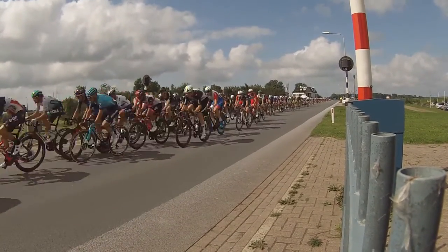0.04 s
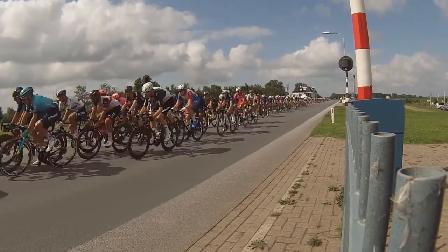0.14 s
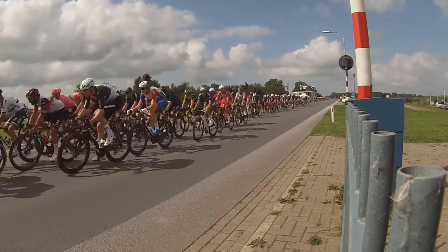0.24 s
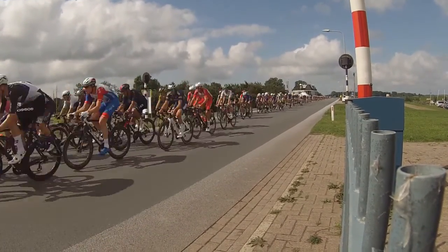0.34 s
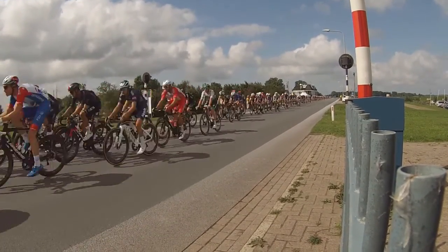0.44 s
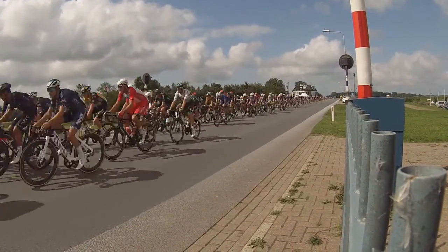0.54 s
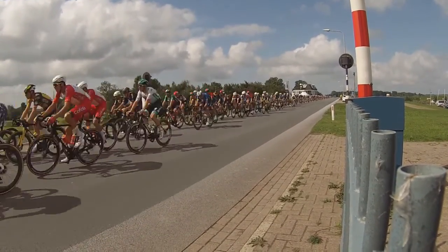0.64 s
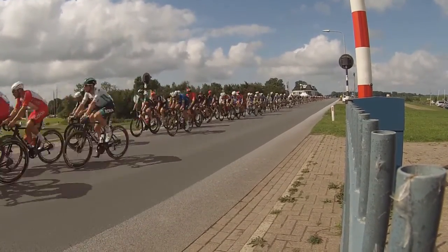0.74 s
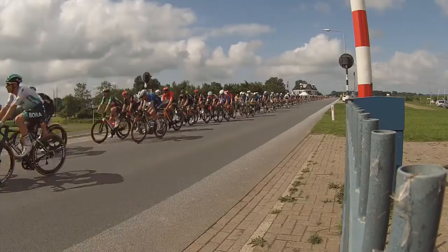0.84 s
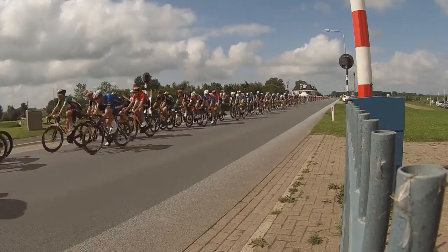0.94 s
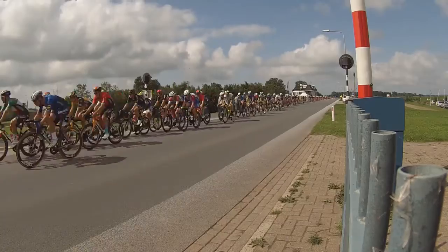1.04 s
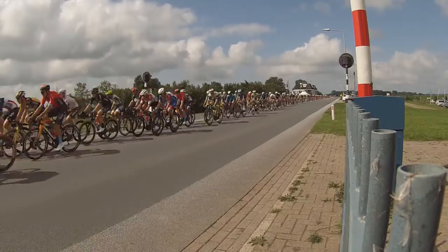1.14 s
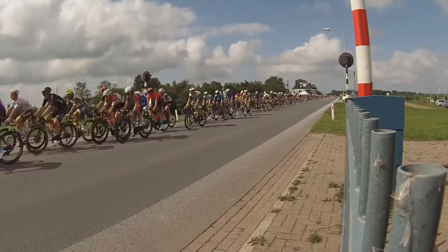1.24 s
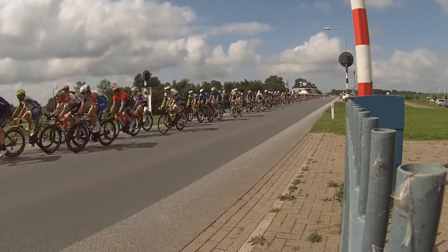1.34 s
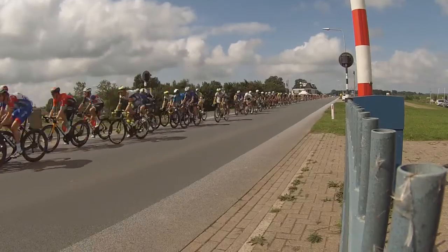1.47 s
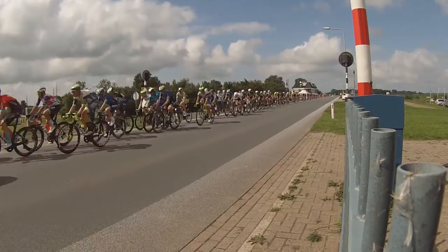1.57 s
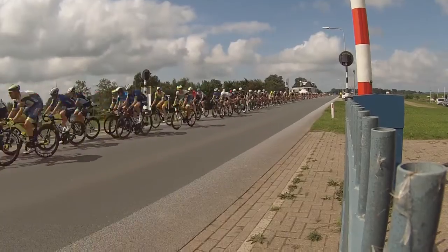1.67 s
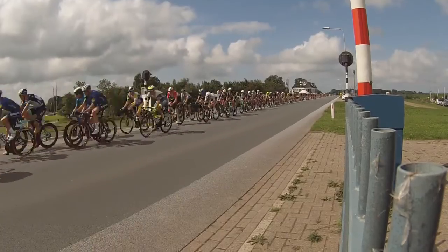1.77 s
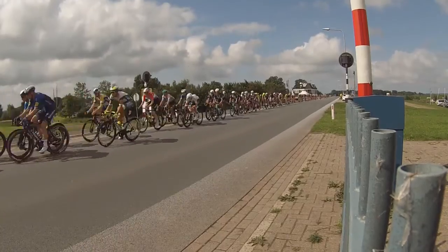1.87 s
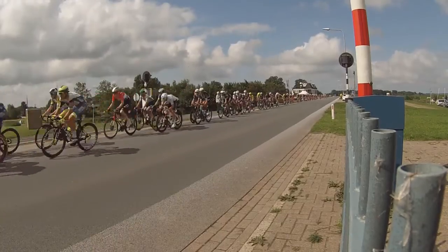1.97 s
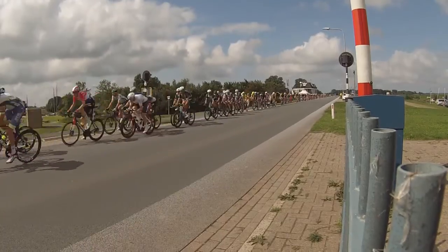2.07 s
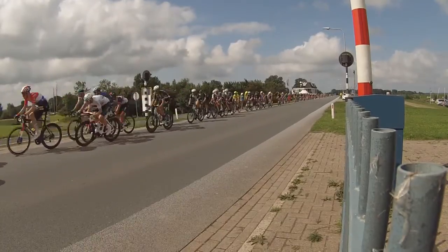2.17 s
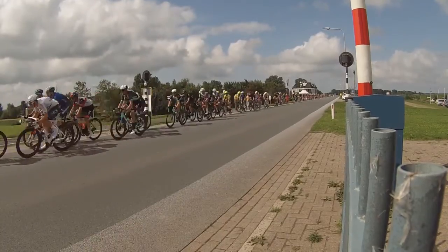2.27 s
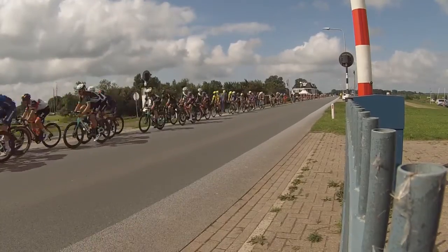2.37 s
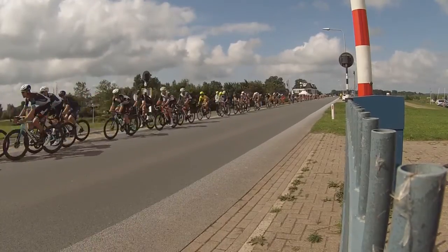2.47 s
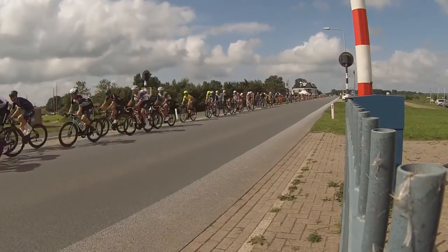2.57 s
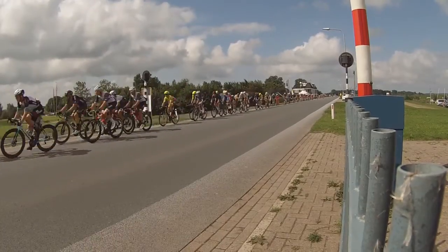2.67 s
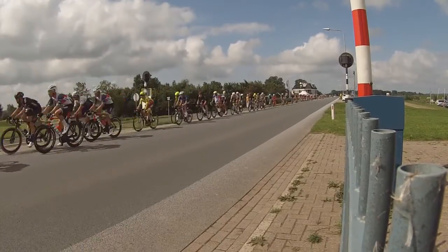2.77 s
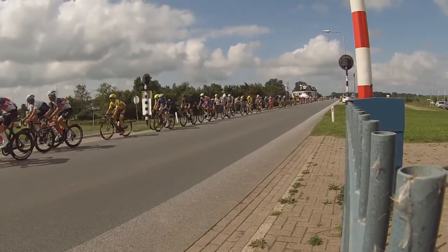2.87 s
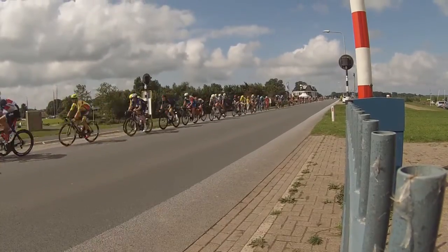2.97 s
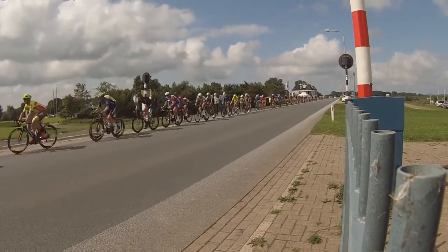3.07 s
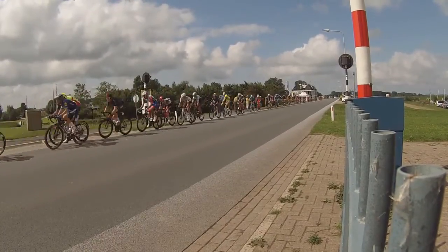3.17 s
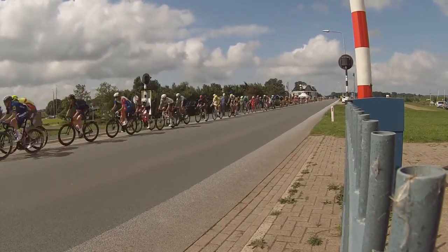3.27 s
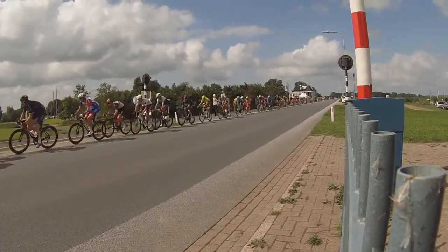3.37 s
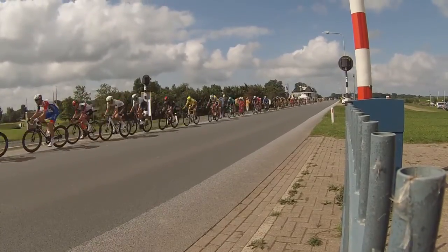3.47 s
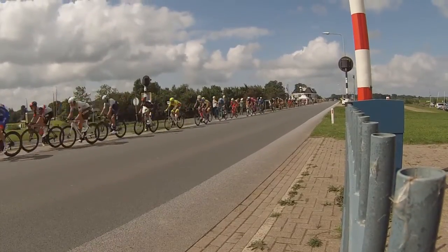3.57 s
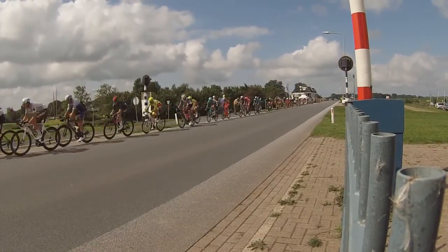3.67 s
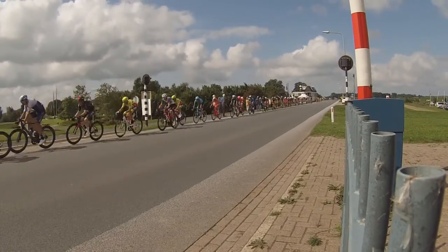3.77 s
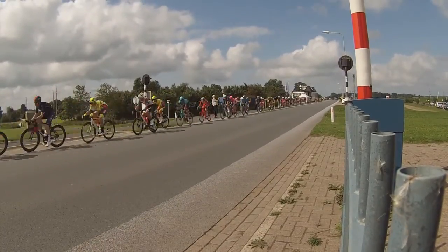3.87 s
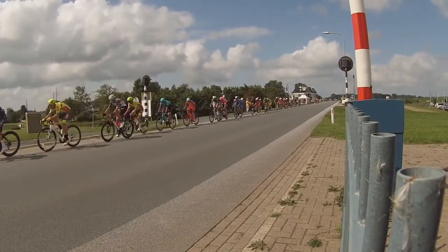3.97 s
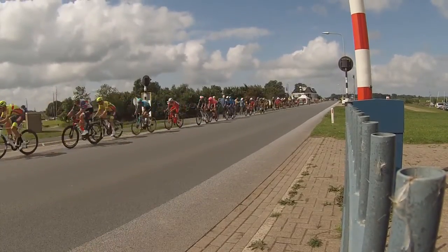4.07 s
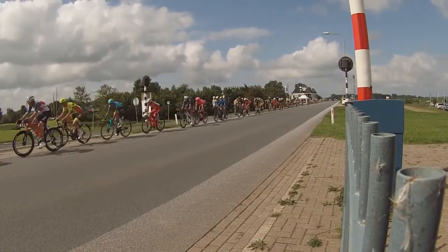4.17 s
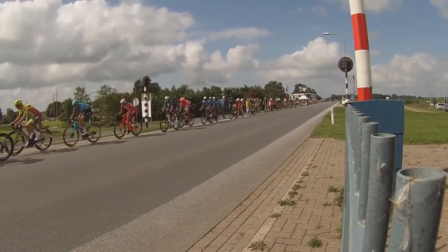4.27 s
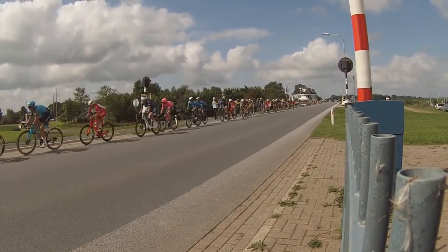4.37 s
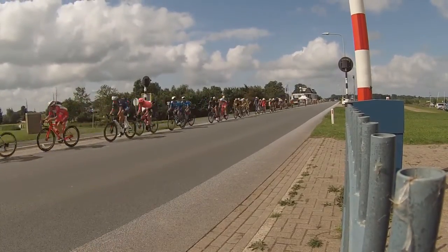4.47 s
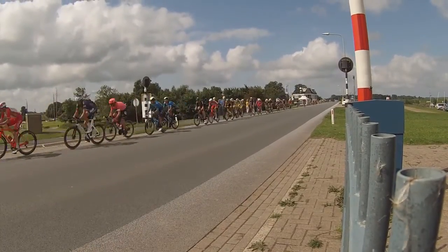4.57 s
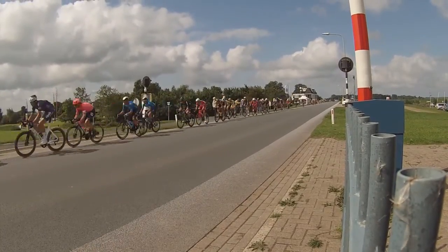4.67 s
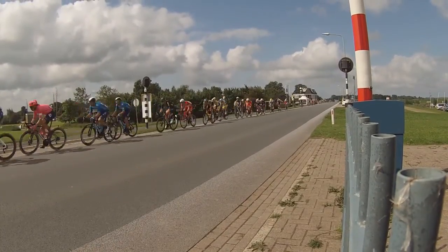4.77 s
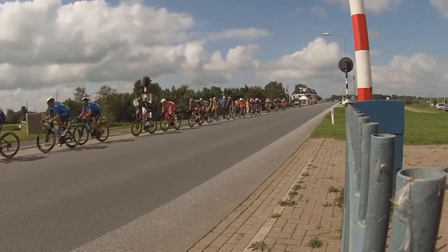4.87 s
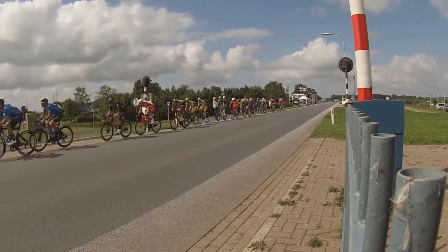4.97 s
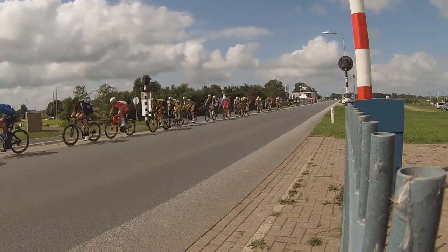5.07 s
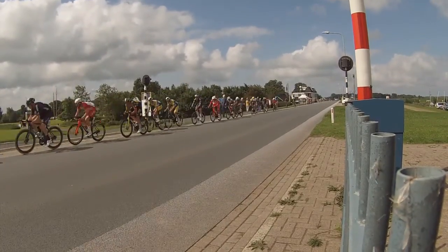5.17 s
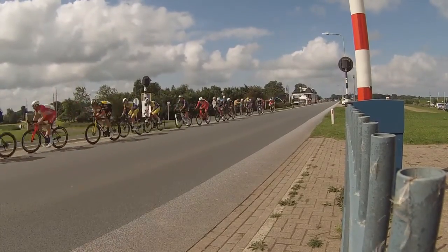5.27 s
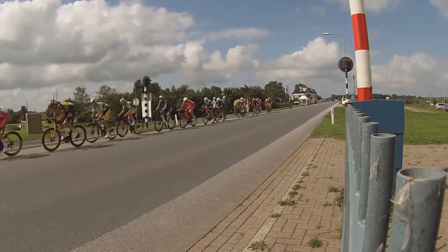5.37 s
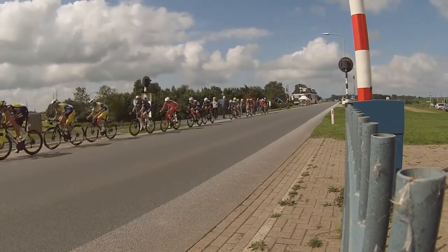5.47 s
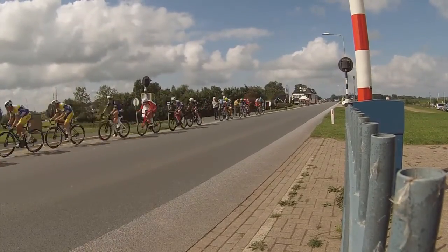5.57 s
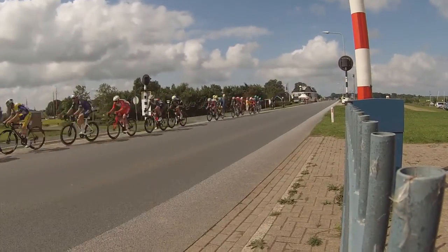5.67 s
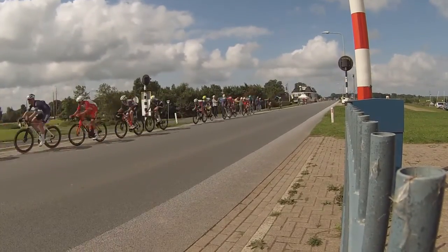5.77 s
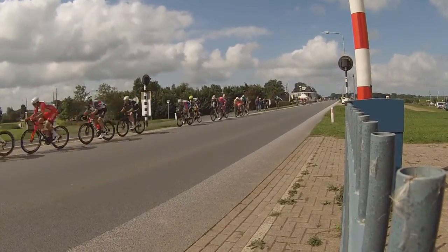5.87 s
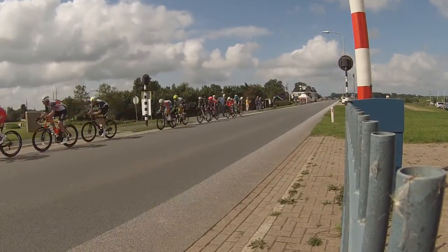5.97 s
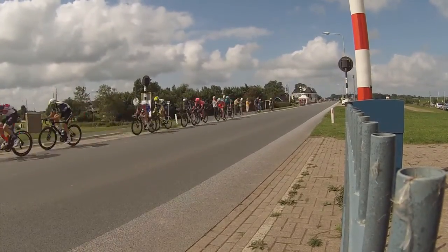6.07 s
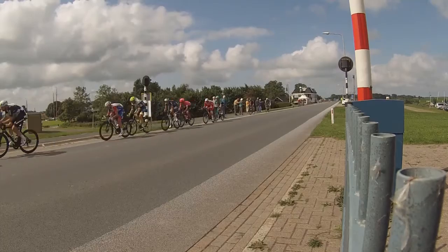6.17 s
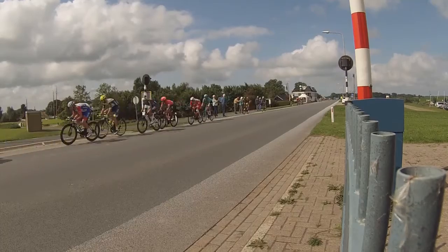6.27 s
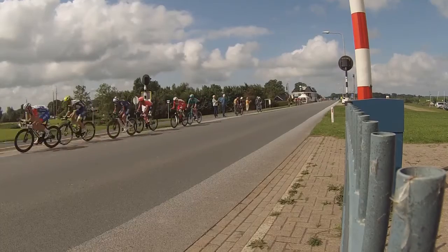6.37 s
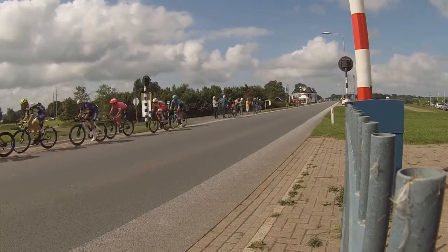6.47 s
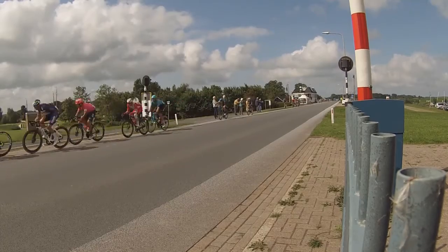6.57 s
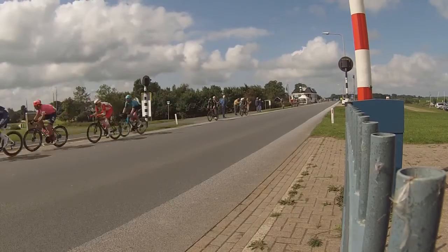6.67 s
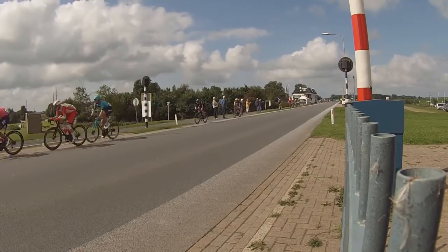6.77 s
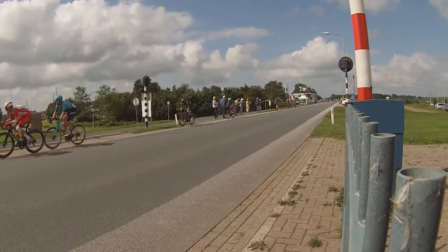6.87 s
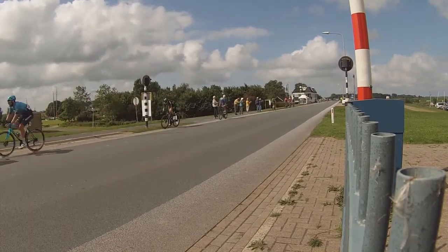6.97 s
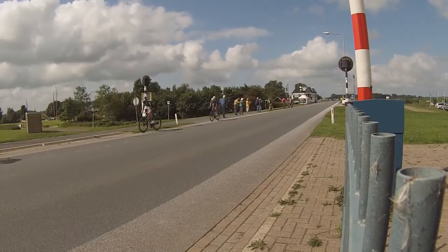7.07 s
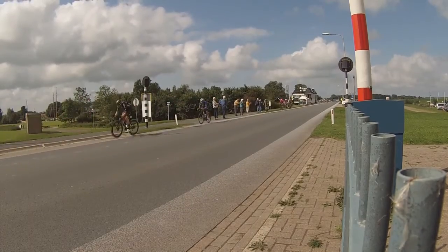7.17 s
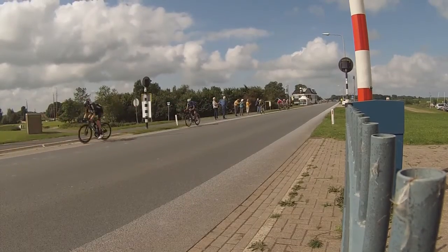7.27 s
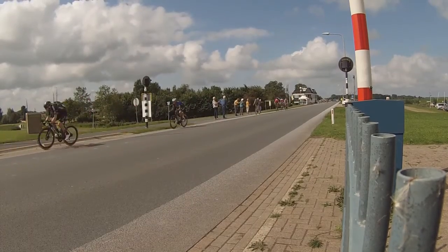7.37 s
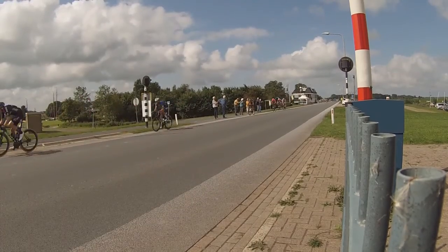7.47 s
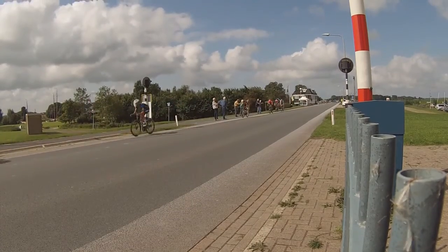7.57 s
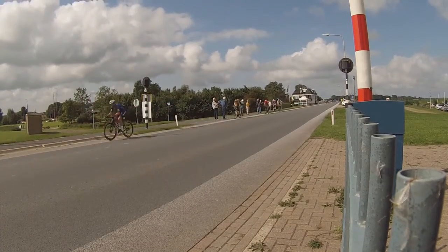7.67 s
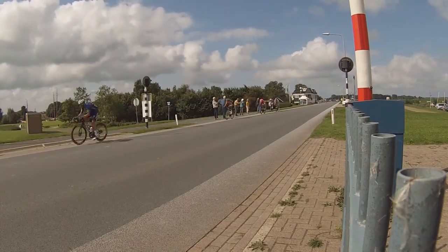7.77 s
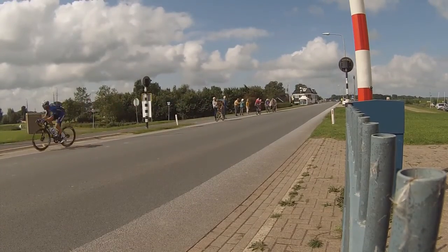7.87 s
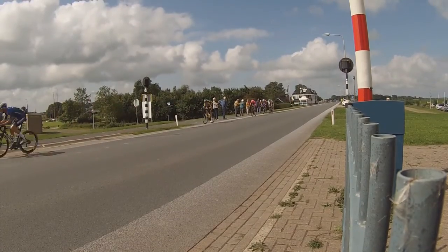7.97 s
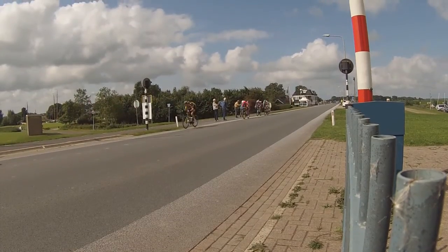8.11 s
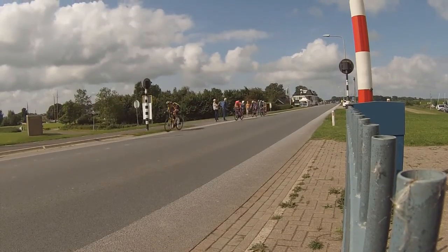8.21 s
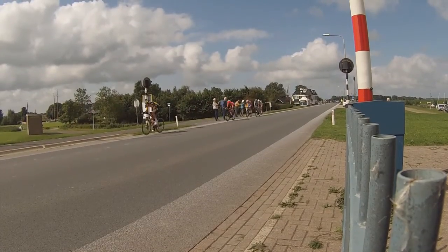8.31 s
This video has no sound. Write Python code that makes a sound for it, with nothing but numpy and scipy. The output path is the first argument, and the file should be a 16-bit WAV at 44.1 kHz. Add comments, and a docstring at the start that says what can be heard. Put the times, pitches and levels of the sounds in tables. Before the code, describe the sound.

Many racing bicycles stream past a small roadside microphone in open country. Their tyres make a continuous hollow, ringing whir on asphalt with airy hiss. A chain sizzle rises around one second, then freewheels buzz briefly near two. Wind buffeting grows from light flutters into hard, low, ragged thumps; loud gusts momentarily push the tyre sound down. A few metallic chain clacks stand out later, and the whir thins as the last riders pass.

```python
"""Tyres of a passing peloton roar and hiss on asphalt: shaped noise with ringing treads and rims.
A fine high hiss, first chain sizzle and then faint background, is grainy shaped noise with small ticks.
Clacks are noise bursts in the bicycle's modes; freewheels buzz as pawl clicks ring their hubs.
Wind and the riders' wake buffet a small roadside camera: turbulent noise in gusts, plus lone eddy pulses.
Its gain control ducks everything at strong peaks, so the tyres swell back slowly after each strong gust.
The treble dips briefly here and there, each time leaving a thin whistle."""
import sys
import numpy as np
from scipy import signal
from scipy.fft import rfft, irfft, next_fast_len
from scipy.io import wavfile
from scipy.ndimage import uniform_filter1d, minimum_filter1d, map_coordinates

SR = 44100
rng = np.random.default_rng(int(sys.argv[2]) if len(sys.argv) > 2 else 0)


def file_out(sig):
    """Save sig as 16-bit WAV at sys.argv[1]."""
    # one column per channel
    cols = np.atleast_2d(sig).T
    # limit, then scale
    lim = np.clip(cols, -1, 1)
    pcm = np.round(lim * 32767).astype(np.int16)
    wavfile.write(sys.argv[1], SR, pcm)


N = 367882
TIME = np.arange(N) / SR


def gain_of(db):
    """Turns decibels into a linear gain."""
    return 10 ** (np.asarray(db) / 20)


def evened(x):
    """Scales a sound to rms 1."""
    return x / np.sqrt(np.mean(x ** 2) + 1e-20)


def follow(rows):
    """Draws each column of an automation table as a straight-line curve over the scene."""
    s, *columns = np.transpose(rows)
    return [np.interp(TIME, s, column) for column in columns]


def add(mix, s, sound):
    """Mixes a sound in at time s, cutting whatever runs past the end."""
    part = mix[max(round(s * SR), 0):][:len(sound)]
    part += sound[:len(part)]


def coloured(x, points):
    """Equalizes x to a spectrum drawn on a log-frequency axis, at rms 1."""
    f, db = np.transpose(points)
    size = next_fast_len(len(x))
    hz = np.fft.rfftfreq(size, 1 / SR)
    curve_db = np.interp(np.log(hz + 1), np.log(f), db)
    return evened(irfft(rfft(x, size) * gain_of(curve_db), size)[:len(x)])


def wander(hz, size):
    """Smooth random modulation of rms 1 that changes up to hz times a second."""
    place = np.arange(size) * 8 * hz / SR  # eight random steps per change
    smooth = signal.windows.gaussian(9, 4 / np.pi)
    noise = rng.standard_normal(size // 8 + 64)[:int(place[-1]) + 12]
    steps = np.convolve(noise, smooth, "valid")
    return evened(np.interp(place, np.arange(len(steps)), steps))


def ring(x, modes):
    """Excites steep resonances (two passes each) with x, each scaled to its own level."""
    out = np.zeros(len(x))
    for hz, width, db in modes:
        b, a = signal.iirpeak(hz, hz / (width * np.pi / 2), fs=SR)
        resonance = signal.lfilter(b, a, signal.lfilter(b, a, x))
        out += gain_of(db) * evened(resonance)
    return out


def file_of_riders(tread, riders_per_s=2.4, glide=0.025045):
    """Riders in single file: each tread tone swells, sinks in pitch and hands over to the next."""
    rate = riders_per_s * np.exp(.25 * wander(2, size=N))
    place = np.cumsum(rate) / SR + rng.random()
    turn = np.pi * (place % 1)
    heard_at = np.cumsum(1 + glide * np.cos(turn))  # Doppler: fast on approach, slow after
    return np.sin(turn) ** 2 * np.interp(heard_at, np.arange(len(tread)), tread)


# the passing bunch: (t/s, roar level/dB, near-tyre hiss level/dB)
BUNCH_LEVELS = [(0, -24, -35.5), (.25, -21, -35), (0.6, -18.5, -34.5), (1.2, -17, -31.5),
                (1.6, -22.5, -37.5), (2.1, -21, -31.5), (2.8, -18, -36), (3.3, -17.5, -33), (3.9, -19, -34),
                (4.6, -18.5, -33.5), (5.25, -17.5, -32), (6.5, -21, -35.5), (7.45, -22, -38.5),
                (8.34, -26.5, -39)]
# riders coming abreast: (t/s, rim level/dB, tread Doppler factor)
ABREAST_CURVE = [(0, -11.5, 1.081), (.5, -14, 1.023), (.8, -9.5, 0.968), (2, -4, 0.962), (2.6, -6, 1.053),
                 (3.2, -6, 1), (5.3, -6, 0.996), (8.34, -0.5, 1.026)]
# spectrum of the road roar: (f/Hz, level/dB per Hz)
ROAR_SPECTRUM = [(400, -38), (560, -15.5), (760, -14.5), (900, -5.5), (1150, -10.5), (1380, -1.5),
                 (1750, -6), (2400, -14.5), (3700, -30), (7000, -55.5), (15000, -73)]
# tyre tread resonances before Doppler: (f/Hz, width/Hz, level/dB)
TREAD_MODES = [(1369.5, 103, -3.5), (1568.2, 68, -9), (1678, 191, -6)]
# hollow rim resonances: (f/Hz, width/Hz, level/dB)
RIM_MODES = [(872, 156.3, -0.5), (1056.2, 239, -0.5)]
# spectrum of the nearest tyres' hiss: (f/Hz, level/dB per Hz)
HISS_SPECTRUM = [(1500, -20), (2500, -0.5), (3300, -1), (4300, -8), (5400, -14), (7500, -22.5),
                 (11000, -32.5), (15000, -38)]


def tyres(grain_db=0.6849, grain_hz=70, tread_db=-3, files=3):
    """Rough asphalt shakes the tyres; treads and rims ring, and the nearest tyres hiss."""
    roar_db, hiss_db = follow(BUNCH_LEVELS)
    rims_db, doppler = follow(ABREAST_CURVE)
    grain = gain_of(grain_db * wander(grain_hz, size=N))
    road = rng.standard_normal((3, N)) * grain
    # the files share one tread noise, read half a second apart
    tread = ring(rng.standard_normal(N + files * SR // 2), TREAD_MODES)
    treads = evened(sum(file_of_riders(tread[k * SR // 2:]) for k in range(files)))
    treads = map_coordinates(treads, [np.cumsum(doppler)], order=3, mode="mirror")
    roar = evened(coloured(road[0], ROAR_SPECTRUM) + gain_of(tread_db) * treads)
    rims = gain_of(rims_db) * evened(ring(road[1], RIM_MODES))
    hiss = coloured(road[2], HISS_SPECTRUM)
    return gain_of(roar_db) * (roar + rims) + gain_of(hiss_db) * hiss


# fine high hiss, chain sizzle at first, then a faint steady background: (t/s, level/dB)
FINE_HISS_LEVELS = [(0, -59.5), (.45, -56), (1.19, -44.5), (1.6, -59.5), (2.9, -61), (5.2, -56), (6.2, -59),
                    (8.34, -57.5)]
# spectrum of the fine hiss: (f/Hz, level/dB per Hz)
FINE_HISS_SPECTRUM = [(3000, -7), (5000, 5), (7500, -7), (9500, -1.5), (12000, -6), (15000, -10.5)]
# resonances of the small ticks: (f/Hz, width/Hz, level/dB)
TICK_MODES = [(9000, 900, -0.5), (11500, 1200, 0)]


def fine_hiss(grain_db=2.0, grain_hz=300, ticks_per_s=14, tick_db=-11, tick_spread_db=4):
    """Chain rollers on many cogs blur into a sizzle, then a faint background hiss; small ticks dot it."""
    level_db, = follow(FINE_HISS_LEVELS)
    grain = gain_of(grain_db * wander(grain_hz, size=N))
    hiss = coloured(rng.standard_normal(N) * grain, FINE_HISS_SPECTRUM)
    strengths = gain_of(tick_spread_db * rng.standard_normal(N))
    strikes = (rng.random(N) < ticks_per_s / SR) * strengths
    ticks = evened(ring(strikes, TICK_MODES))
    return gain_of(level_db) * (hiss + gain_of(tick_db) * ticks)


def eddies(eddy_hz, size, ragged_db, ragged_hz, low_hz, fine):
    """Turbulent pressure: clumped kicks, rounded off above the rate at which eddies cross the port."""
    kicks = rng.standard_normal(size) * gain_of(ragged_db * wander(ragged_hz, size=size))
    full = next_fast_len(size + 2048)  # spare room for the filter's tail
    hz = np.fft.rfftfreq(full, 1 / SR)
    low_cut = 1j * hz / (low_hz + 1j * hz)
    shape = low_cut / (1 + 1j * hz / eddy_hz) / (1 + (hz / (fine * eddy_hz)) ** 2)
    return evened(irfft(rfft(kicks, full) * shape, full)[:size])


def swing(hz, order=4):
    """An eddy crossing the port gives a quick swing or two of pressure, centred in 40 ms."""
    t = np.arange(-SR // 50, SR // 50) / SR
    phase = np.exp(2j * np.pi * rng.random())
    return (phase / (1 - 2j * np.pi * hz * t / order) ** order).real


# air moving past the microphone: (t/s, flutter level/dB, rumble level/dB before its trim)
BREEZE_LEVELS = [(0, -36, -21), (0.45, -23, -29), (0.6, -31.5, -24.5), (0.75, -21, -29.5),
                 (1.4, -24.5, -18.5), (1.7, -20.5, -20.5), (1.95, -17.5, -38.5), (2.2, -14, -20),
                 (2.8, -23, -21.5), (3.5, -17, -12.5), (3.95, -14, -28), (4.78, -13, -8), (4.97, -27, -23),
                 (5.32, -22.5, -19.5), (5.5, -8.5, -5.5), (6.1, -13, -20.5), (6.8, -18, -33),
                 (7.6, -18, -17), (8.34, -15, -16)]
# spectrum of the deep rumble: (f/Hz, level/dB per Hz)
RUMBLE_SPECTRUM = [(10, 11), (22, -7), (45, 7.5), (70, 0), (105, 4), (170, -25.5), (400, -53.5)]


def breeze(rumble_trim_db=-1.5, puffs_per_s=14, puff_db=6, puff_hz=400, sizes=3):
    """Slow air rumbles and flutters on the microphone, with stray small puffs."""
    flutter_db, rumble_db = follow(BREEZE_LEVELS)
    flutter = eddies(130.7, size=N, ragged_db=3.5, ragged_hz=39.398, low_hz=78.7, fine=4.7)
    for hz in np.geomspace(puff_hz / 2, puff_hz, sizes):
        strikes = rng.random(N) < puffs_per_s / sizes / SR
        puffs = signal.oaconvolve(1. * strikes, swing(hz), "same")
        flutter = flutter + gain_of(puff_db) * puffs
    rumble = coloured(rng.standard_normal(N), RUMBLE_SPECTRUM)
    return gain_of(flutter_db) * flutter + gain_of(rumble_db + rumble_trim_db) * rumble


# gusts striking the microphone: (t/s at half rise, length/s, level/dB before trim, eddy rate f/Hz)
GUST_EVENTS = [(0.014, 0.095, -15, 124.6), (0.191, 0.0295, -18.5, 184.4), (.294, 0.0436, -12.5, 217),
               (0.413, 0.027, -15, 187), (0.741, 0.188, -20, 189), (1.294, 0.2046, -12, 181),
               (1.735, 0.165, -15, 259), (2.559, 0.047, -18, 220), (2.905, 0.0317, -9, 175),
               (2.945, 0.0455, -1, 362), (3.031, 0.0433, -7, 410), (3.321, 0.0638, -6, 304),
               (3.489, .11, -4.5, 460), (3.622, 0.0271, -2, 401), (3.663, 0.0243, -3.5, 291),
               (3.821, 0.154, -12.5, 253), (4.07, 0.065, -11, 330.4), (4.278, 0.13, -10, 209.9),
               (4.47, 0.4, -9, 182.5), (5.392, 0.0677, 0.5, 442.6), (5.49, 0.0626, -0.5, 505),
               (5.57, 0.137, -9.5, 181), (5.724, 0.05707, -4, 504.1), (5.966, 0.0215, -3, 530),
               (6.108, 0.036, -4, 249), (6.234, 0.056, -0.5, 496), (6.302, 0.05, -7, 300),
               (6.437, 0.1203, -5.5, 516), (6.736, 0.07, -9.5, 344), (6.844, 0.118, -10, 297),
               (7.256, 0.1015, -8, 160.4), (7.565, 0.1155, -4.5, 126.6), (7.684, 0.046, 0, 380),
               (7.75, 0.052, -9, 324), (8.022, 0.0332, 1, 330), (8.16, 0.0385, -7.5, 190),
               (8.237, 0.062, -1, 220)]


def gusts(half_rise_s=0.004044, release_s=0.0163, trim_db=-1, crest=4.61, swings_per_s=30,
          swing_db=6, swing_ratio=1.634, front_s=0.005957, front_db=11, sag_db=3):
    """A gust leads with one large eddy, sags as a ragged train and dies away; faster air is sharper."""
    out = np.zeros(N)
    for s, length, db, eddy_hz in GUST_EVENTS:
        t = np.arange(round((length + .08) * SR)) / SR
        swell = np.minimum(t / (2 * half_rise_s), 1)
        swell = swell * np.exp(-np.maximum(t - length, 0) / release_s)
        swell = swell * gain_of(sag_db * (.5 - t / length))
        small = eddies(eddy_hz, size=len(t), ragged_db=5.0, ragged_hz=89.37, low_hz=73, fine=2.81)
        strikes = gain_of(swing_db) * (rng.random(len(t)) < swings_per_s / SR)
        add(strikes, half_rise_s + front_s, gain_of([front_db]))  # the leading eddy
        large = signal.fftconvolve(strikes, swing(swing_ratio * eddy_hz), "same")
        pressure = evened(swell * (small + large)) * np.sqrt(np.mean(swell ** 2))
        rounded = crest * np.tanh(pressure / crest)  # soft limit on the peaks
        add(out, s - half_rise_s, gain_of(db + trim_db) * rounded)
    return out


# chains and gears clacking: (t/s, level/dB before trim, 60 dB decay time/s)
CLACK_EVENTS = [(.124, -16.5, 0.052), (1.044, -11.5, 0.046), (1.525, -15, 0.04893), (5.277, -2, 0.084),
                (5.29, -13.5, 0.1), (6.73, -9.5, 0.0271), (6.747, -13.5, .05), (6.858, -11.5, .06),
                (7.241, -17, 0.024), (7.647, -2.5, 0.0149)]
# bicycle resonances: (f/Hz, width/Hz, level/dB)
FRAME_MODES = [(1110, 506, 10.5), (2205, 235, 8.5), (3218, 586, 7.5), (4450, 394, 0.5), (4963, 910, 0.5),
               (6160, 670, -15), (7840, 730, -14), (10400, 1230, -24.5), (12700, 900, -17.5)]


def clacks(rise_s=0.00074, trim_db=-7):
    """A chain jumps a cog or slaps the frame: a short noise rattle in the bicycle's modes."""
    out, t = np.zeros(N), np.arange(SR // 6) / SR
    for s, db, t60 in CLACK_EVENTS:
        rattle = evened(ring(rng.standard_normal(len(t)), FRAME_MODES))
        attack = 1 - np.exp(-t / rise_s)
        add(out, s, gain_of(db + trim_db - 60 * t / t60) * attack * rattle)
    return out


# lone eddies thumping out of the wind: (t/s at centre, level/dB before trim, f/Hz)
THUMP_EVENTS = [(.33, -9, 500), (1.479, -1.5, 522), (1.794, 4, 470.5), (1.954, -2.5, 480), (3.136, 5, 600),
                (3.589, 5, 1000), (3.631, 7.5, 349), (4.115, 4, 460), (4.491, 5.5, 314), (5.502, 9, 1300),
                (5.761, 6.5, 754.7), (5.921, 3, 600), (6.409, 7.5, 397), (6.469, 6, 1100), (6.911, 6, 400),
                (7.598, 6, 504), (7.958, 2, 290), (8.031, 7, 1084), (8.324, 1, 474.6)]


def thumps(trim_db=1):
    """Lone eddies strike the port, each one a single pressure swing."""
    out = np.zeros(N)
    for s, db, hz in THUMP_EVENTS:
        pressure = swing(hz)
        add(out, s - len(pressure) / 2 / SR, gain_of(db + trim_db) * pressure)
    return out


def wind(port_hz=2800, lowest_hz=14):
    """The microphone's port muffles the finest eddies and lets steady pressure leak away."""
    port = signal.butter(3, [lowest_hz, port_hz], "band", fs=SR, output="sos")
    return signal.sosfilt(port, breeze() + gusts() + thumps())


# coasting riders: (t/s, buzz level/dB, Doppler factor)
COASTING_CURVE = [(1.0, -72, 1.1), (1.35, -50.5, 0.91), (1.62, -39.5, 1.053), (1.775, -41.5, 0.94),
                  (1.8, -43.5, .995), (2.08, -36.5, .97), (2.3, -42.5, 1.02), (2.6, -73, 1),
                  (2.95, -80, 0.73)]
# freewheel hub resonances before Doppler: (f/Hz, width/Hz, level/dB)
HUB_MODES = [(3688, 190, 1), (4740, 610, -2.5), (6460, 336, -7), (8260, 1450, -4), (9090, 400, -14),
             (11420, 1450, -6.5), (12880, 2200, -10)]


def freewheels(pawl_hz=270, spread=.15, rattle=0.043, shade_db=1.6, hubs=4):
    """Pawls snap over the ratchets of several hubs; Doppler bends their ring as riders pass."""
    level_db, doppler = follow(COASTING_CURVE)
    clicks = np.zeros(N)
    for _ in range(hubs):
        hub_hz = pawl_hz * np.exp(spread * rng.standard_normal())
        rate = hub_hz * (1 + 0.023 * wander(10, size=N))
        snaps = np.diff(np.floor(np.cumsum(rate) / SR), prepend=0)
        clicks += snaps * rng.uniform(.5, 1, N)
    drive = clicks - clicks.mean() + rattle * hubs * rng.standard_normal(N)
    buzz = np.zeros(N)
    for mode in HUB_MODES:
        shade = gain_of(shade_db * wander(14, size=N))  # legs and wheels shade each mode separately
        buzz += ring(drive, [mode]) * shade
    passing = map_coordinates(buzz, [np.cumsum(doppler)], order=3, mode="mirror")
    return gain_of(level_db) * evened(passing)


def scene():
    """Bicycles, fine hiss and wind sum at one microphone."""
    soft_ends = signal.windows.tukey(N, .001)
    bicycles = tyres() + clacks() + freewheels()
    return (soft_ends * (bicycles + fine_hiss() + wind()))[None]


def gain_control(x, limit_db=-2.0517, recover_db_per_s=7, sense_s=.003):
    """Turns down around each peak over the limit, then recovers at a steady rate in dB."""
    window = max(round(sense_s * SR), 1)
    peak = -minimum_filter1d(-abs(x), window)  # highest magnitude nearby
    over_db = np.maximum(20 * np.log10(peak + 1e-9) - limit_db, 0)
    recovery_db = recover_db_per_s * TIME
    # the deepest duck so far holds, less what has been recovered since
    duck_db = np.maximum.accumulate(over_db + recovery_db, axis=-1) - recovery_db
    return x * gain_of(-uniform_filter1d(duck_db, window))


# brief treble dips: (t/s at centre, depth/dB)
TREBLE_DIPS = [(.152, 17.5), (1.07, 16), (1.136, 12.5), (1.264, 12), (1.987, 13.5), (2.521, 8)]


def record(dry, dip_s=0.0052, treble_hz=3000, whistle_hz=2880, whistle_db=-33, edge_hz=15250):
    """Treble dips leave a thin whistle; gain control ducks the peaks; a low-pass limits the band."""
    dips = [np.exp(-.5 * ((TIME - s) / dip_s) ** 2) for s, _ in TREBLE_DIPS]
    depth_db = sum(db * dip for (_, db), dip in zip(TREBLE_DIPS, dips))
    high_pass = signal.butter(4, treble_hz, "high", fs=SR, output="sos")
    treble = signal.sosfiltfilt(high_pass, dry)
    whistle = gain_of(whistle_db) * sum(dips) * np.sin(2 * np.pi * whistle_hz * TIME)
    sound = gain_control(dry + (gain_of(-depth_db) - 1) * treble + whistle)
    band_limit = signal.firwin(511, edge_hz, window=("kaiser", 9), fs=SR)
    return signal.oaconvolve(sound, band_limit[None], "same")


dry = scene()
out = record(dry)
file_out(out)
```